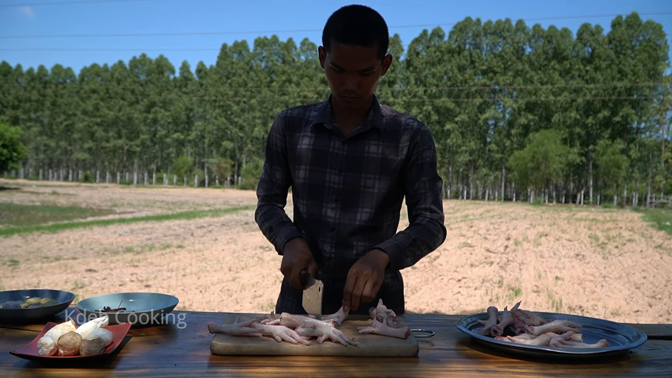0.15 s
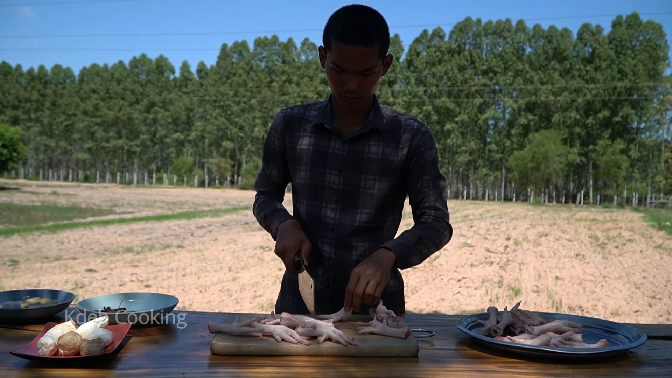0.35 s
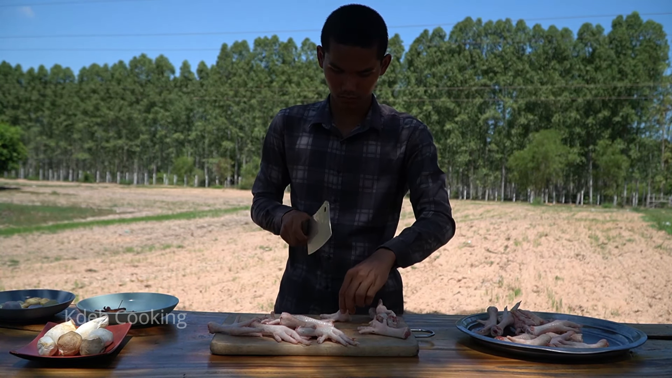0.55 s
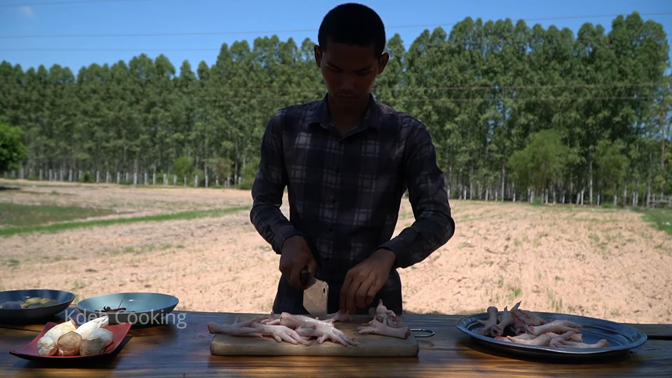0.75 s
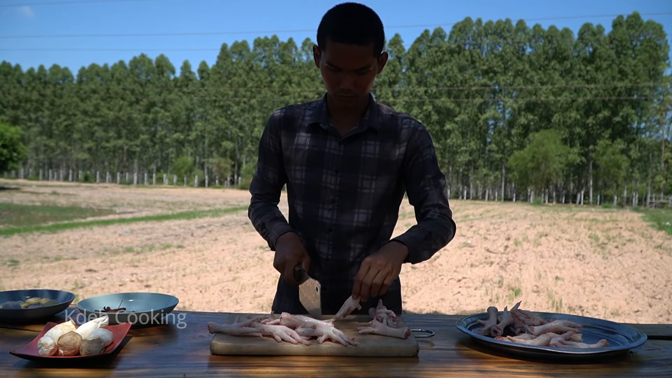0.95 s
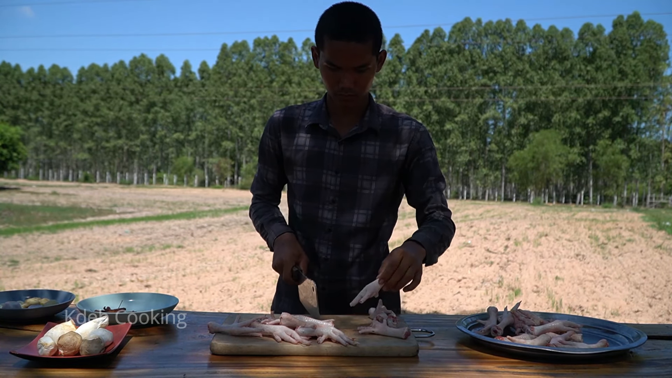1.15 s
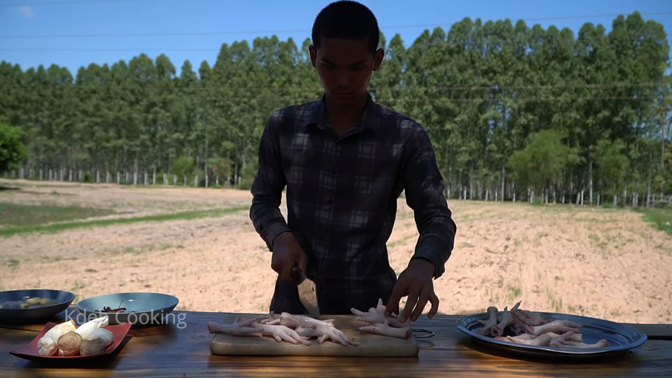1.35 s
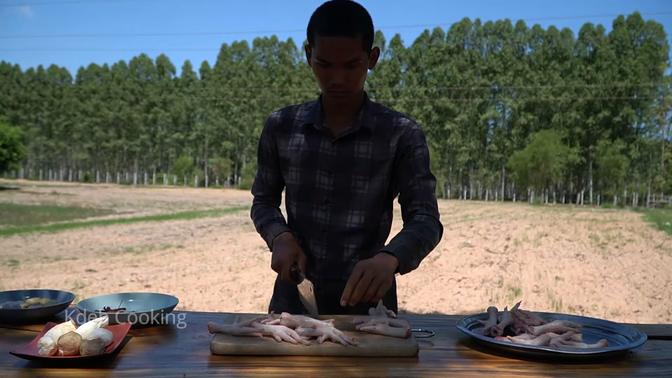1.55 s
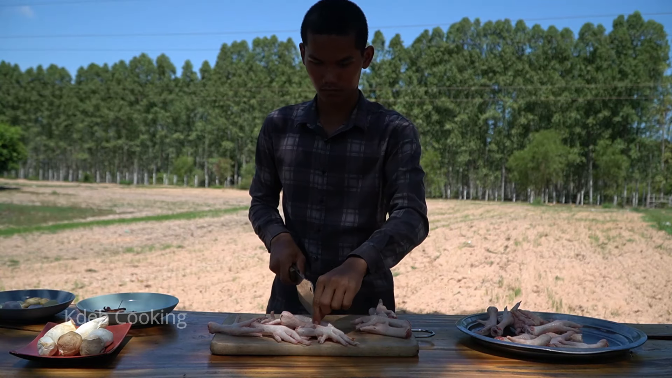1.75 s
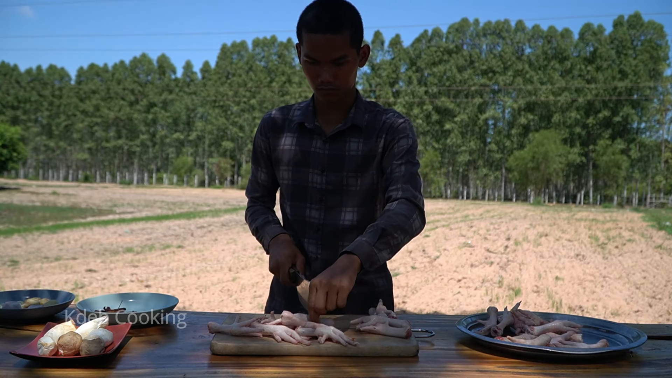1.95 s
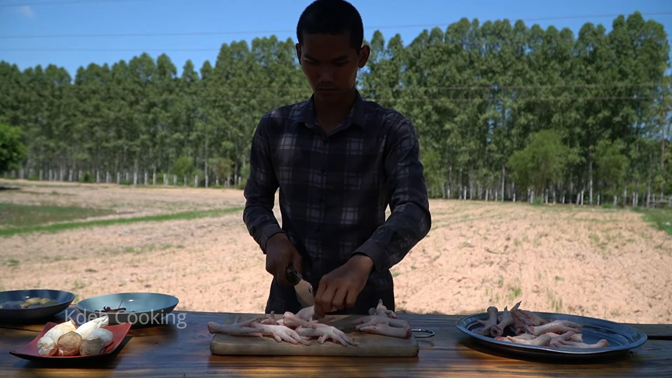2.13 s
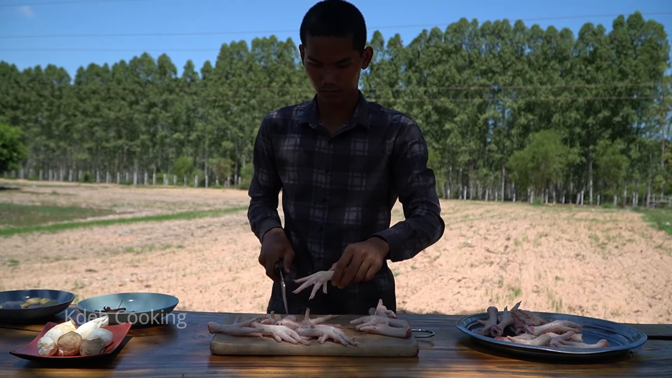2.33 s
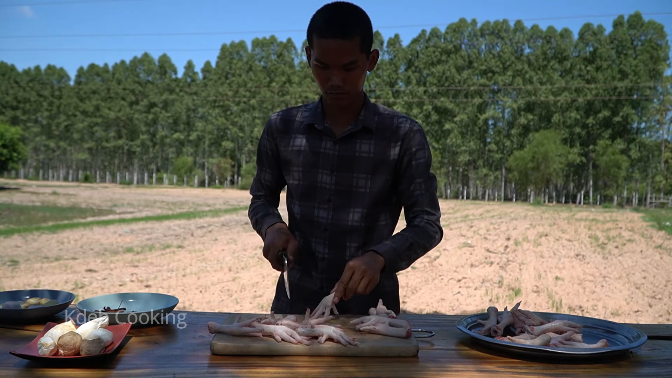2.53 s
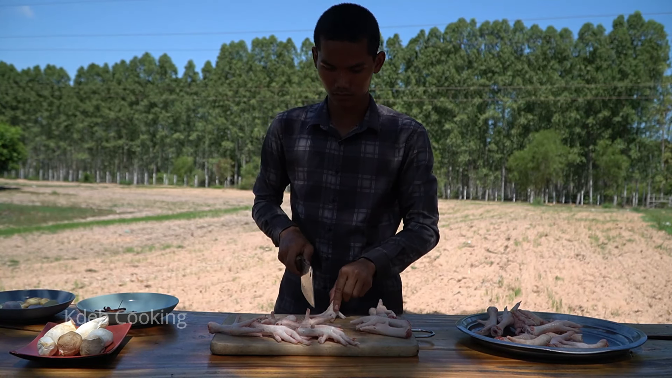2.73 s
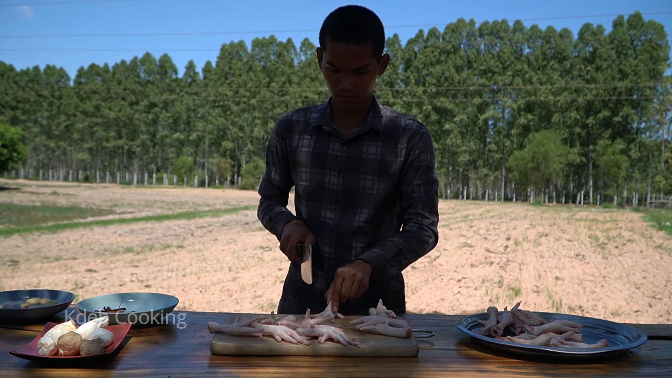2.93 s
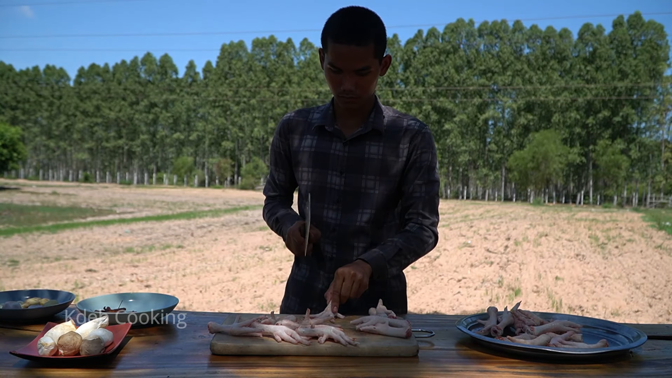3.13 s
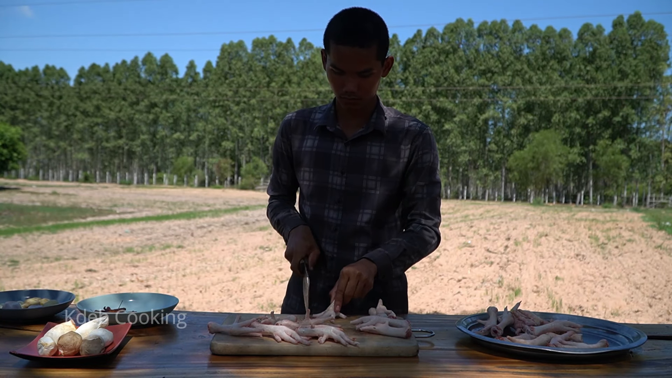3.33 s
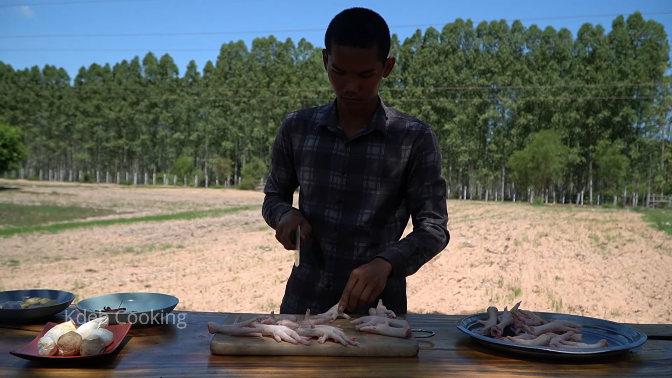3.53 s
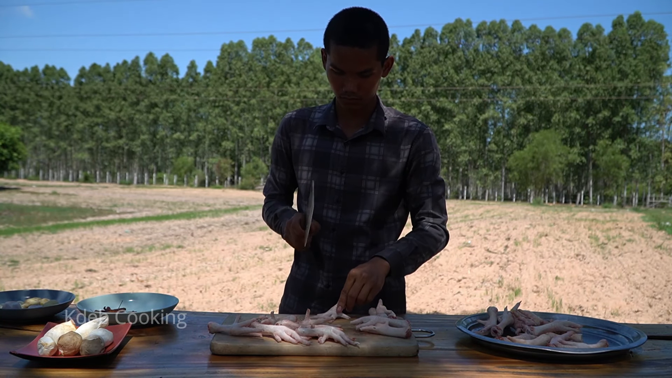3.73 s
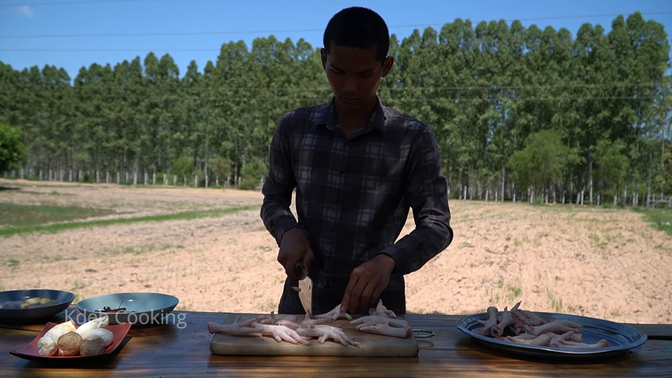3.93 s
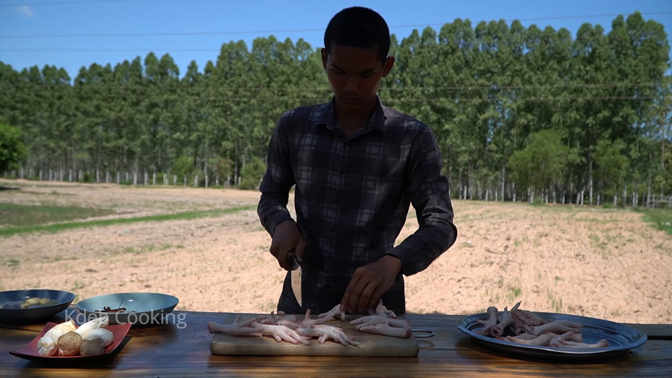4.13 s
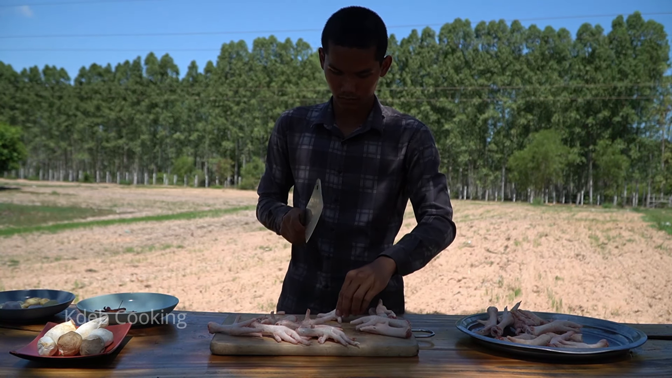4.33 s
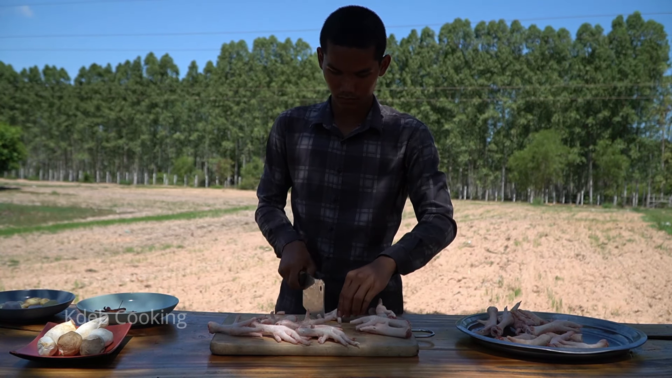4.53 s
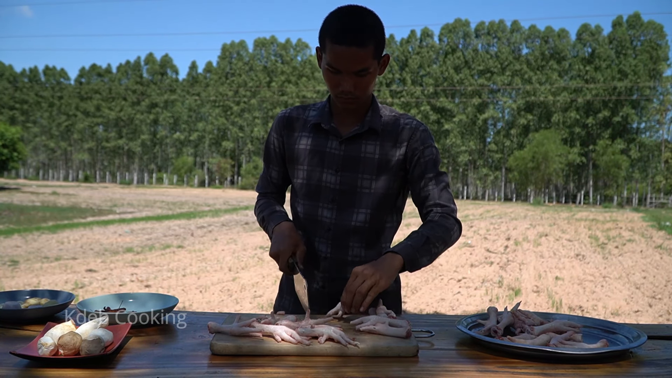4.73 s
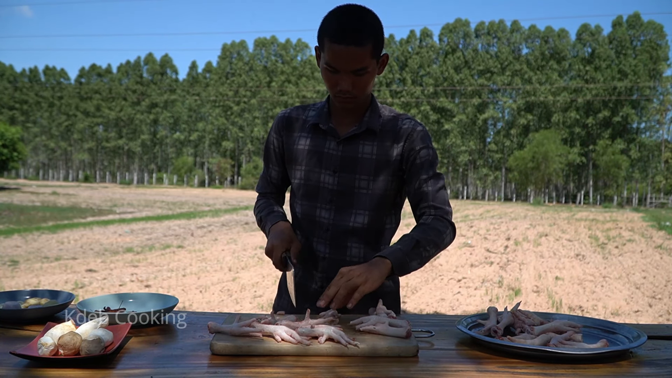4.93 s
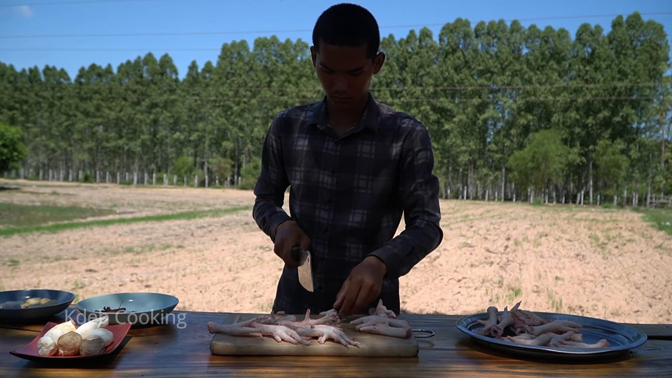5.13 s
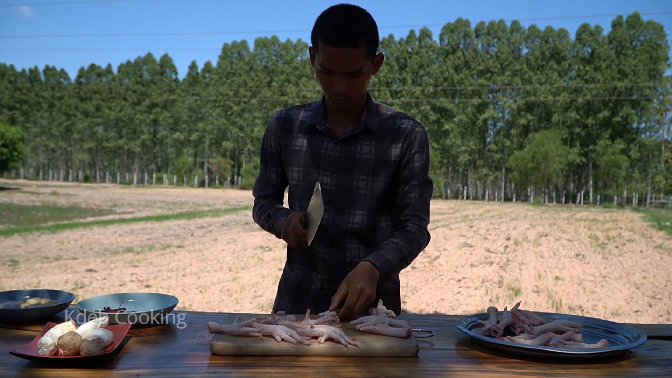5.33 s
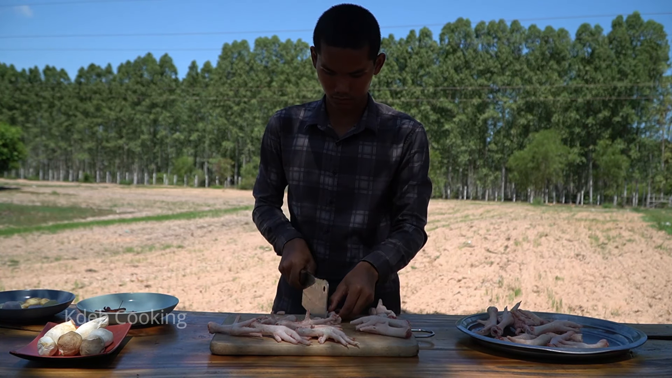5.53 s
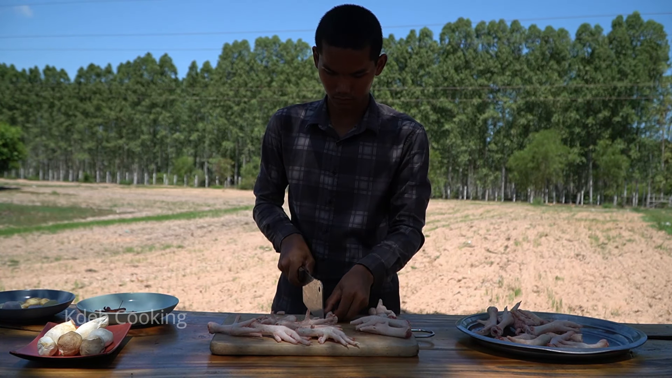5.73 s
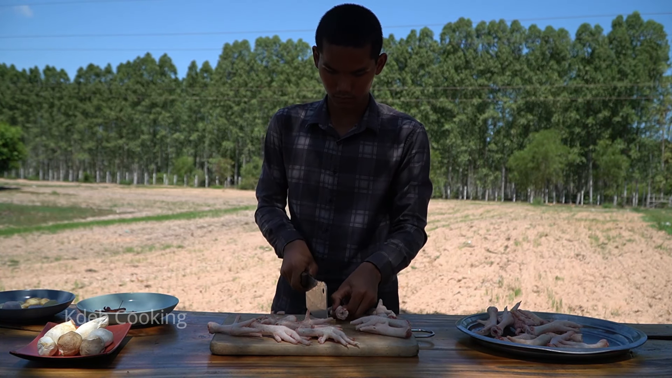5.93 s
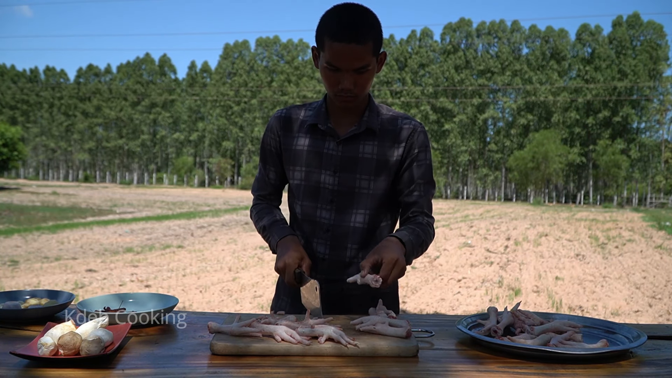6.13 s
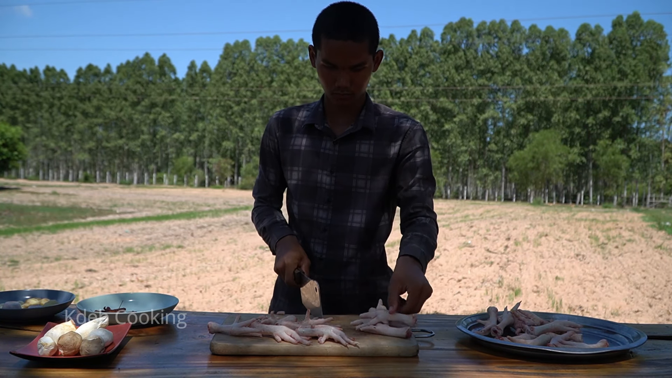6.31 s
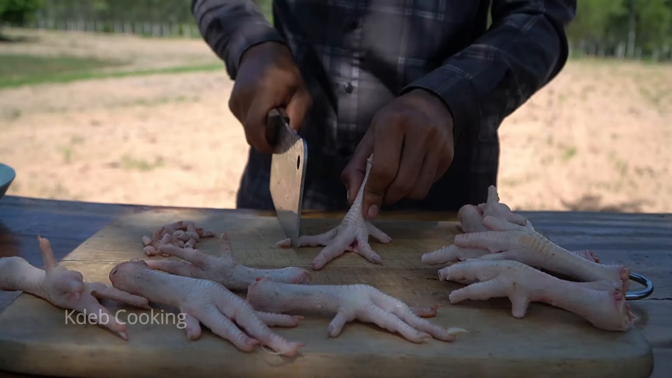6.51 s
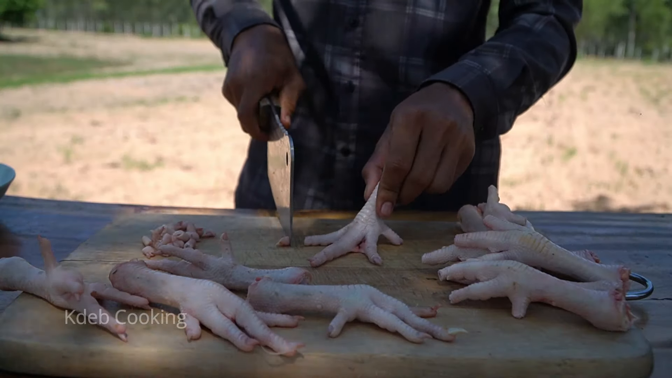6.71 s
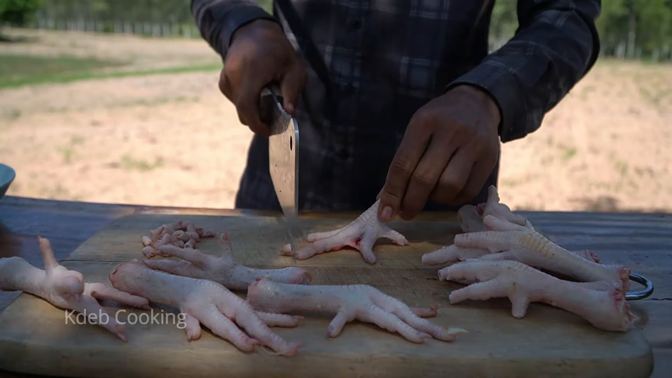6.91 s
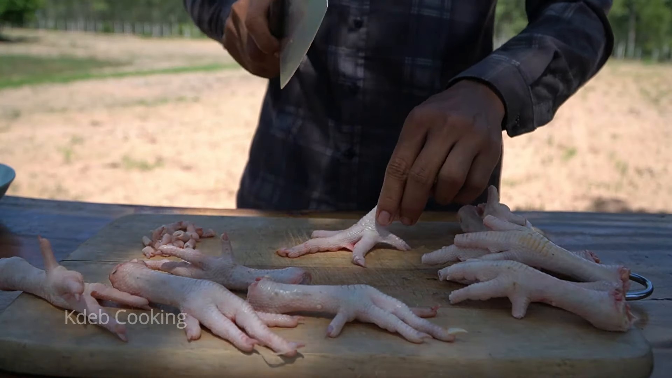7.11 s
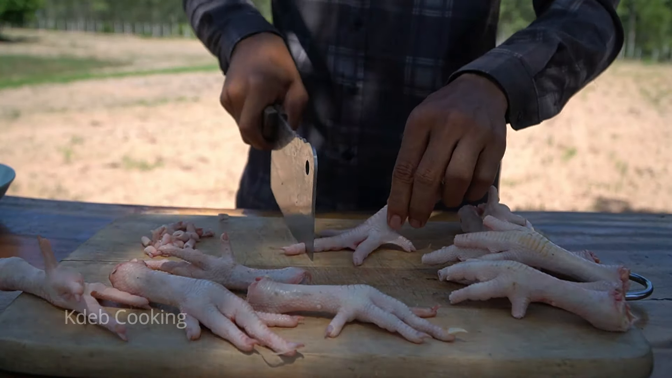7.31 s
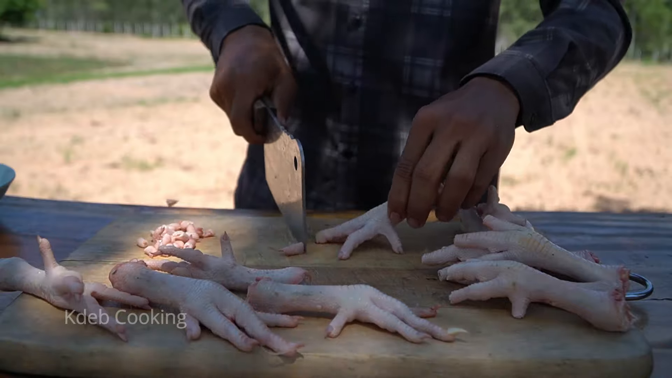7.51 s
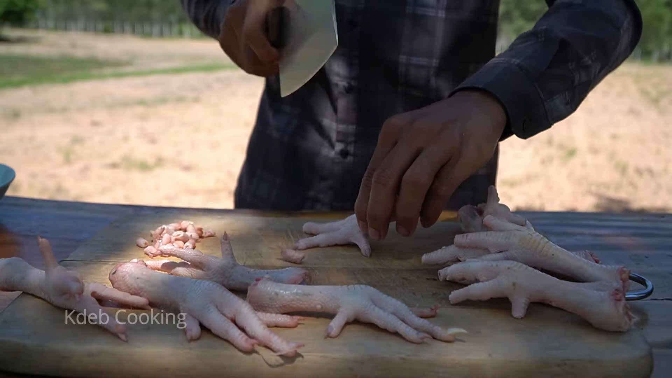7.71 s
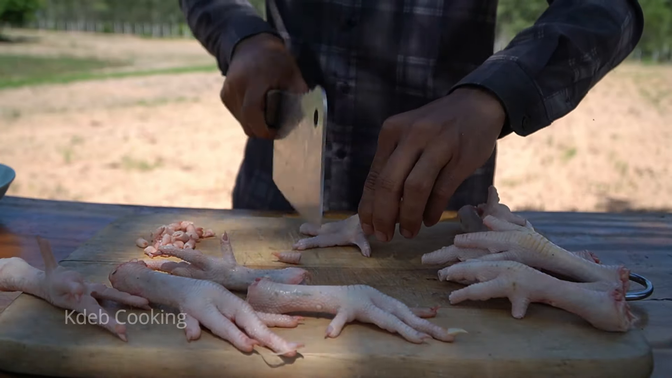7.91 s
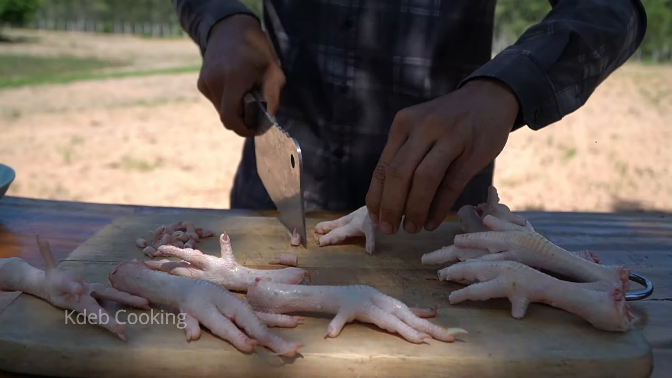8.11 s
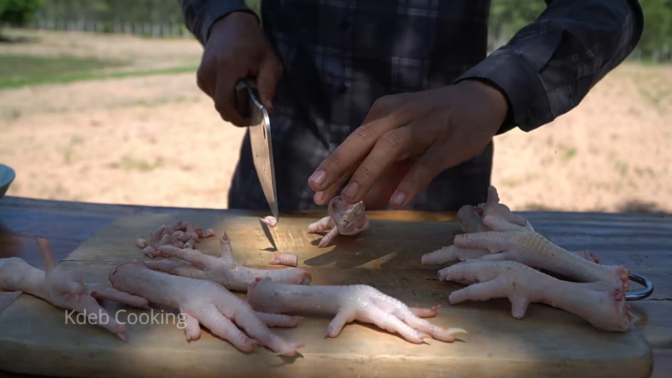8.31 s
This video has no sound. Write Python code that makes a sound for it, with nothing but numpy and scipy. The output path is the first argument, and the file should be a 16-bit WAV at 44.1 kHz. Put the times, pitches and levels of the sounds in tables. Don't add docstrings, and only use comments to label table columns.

```python
import sys
import numpy as np
from scipy import signal
from scipy.fft import rfft, irfft, next_fast_len
from scipy.io import wavfile

SR = 44100
rng = np.random.default_rng(int(sys.argv[2]) if len(sys.argv) > 2 else 0)


def digitize_waveform(pressure):
    field = np.atleast_2d(pressure).T
    bounded = np.clip(field, -1, 1)
    quanta = np.round(bounded * 32767).astype(np.int16)
    wavfile.write(sys.argv[1], SR, quanta)


def magnitude_from_level(level_db):
    exponent = np.asarray(level_db, float) / 20
    return 10 ** exponent


N = 368676
NEAR_S = 6.426

# start in seconds, ring level in dB, rattle level in dB,
# rattle tilt in dB per octave, decay factor.
BLOWS = [
    (0.206, -29.5, -32.5, 0.5, 1.045),
    (.818, -29.5, -30.5, 0.5, 1.08),
    (3.2821, -28, -33, 1, 1.01),
    (3.894, -31, -34, -0.1, 1.08),
    (4.5644, -30, -32.5, 0.44, 1.204),
    (5.5539, -29.5, -37, 1.6, 0.92),
    (6.5228, -30.5, -28.5, -1, 1),
    (7.2941, -30, -27.5, -3, 0.86),
    (7.9858, -29, -27, 0, 1.013),
]
# body in dB, hiss in dB.
BODY_DB = [(-7, 1), (-13, .1), (-6, 0), (-3, .1), (-5.5, 9), (-2.5, 16), (1, -1.5), (1.5, -3), (2, -1.5)]
# time in seconds, then crunch, knock, crack and edge levels in dB.
LANDINGS = [
    (0.2069, -27.5, -15.5, -15, -25.5),
    (.8184, -34.5, -16.5, -12.5, -22.5),
    (3.2844, -35, -15.5, -17.5, -29),
    (3.8936, -34.5, -17, -15.5, -31),
    (4.5653, -28, -16, -19, -27),
    (5.5562, -27, -17.5, -20.5, -29),
    (6.5217, -25, -15, -12.5, -24.5),
    (7.2961, -22, -13, -14, -20),
    (7.9849, -18.5, -13, -10, -20),
]
# knock in Hz, crack in Hz, crunch length in seconds,
# share of crunch at first bite, share of outer modes.
LANDING_COLOURS = [(1530, 2900, 0.0032, 0.17, 0.46), (1430, 2700, 0.0018, 0.34, 0.53),
                   (1550, 4010, 0.0037, .25, 0.27), (1320, 2460, 0.0041, .9, 0.44),
                   (1310, 2480, 0.0034, 0.33, 0.43), (1460, 2470, 0.0042, 0.37, .4),
                   (1160, 3100, .0025, 1, 0.61), (1050, 2870, 0.0041, 0.74, 0.37),
                   (1134, 3000, 0.0029, 0.22, 0.63)]
# frequency in Hz, t60 in seconds.
CONTACT_COLOURS = [
    [(1000, 0.011), (1400, 0.01), (1800, 0.0086)],
    [(2450, 0.0093), (3250, 0.0049), (4300, 0.0047)],
    [(5600, 0.0081), (7600, 0.00038), (10200, 0.0015)],
]


def at_hz(points, hz):
    table = np.array(points)
    return np.interp(np.log(hz), np.log(table[:, 0]), table[:, 1])


def rms_one(x):
    return x / np.sqrt(np.mean(x ** 2) + 1e-20)


def drift(rate):
    r = np.exp(-80 * np.pi * rate / SR)
    slow = signal.lfilter([1], [1, -2 * r, r * r], rng.standard_normal(N // 40 + 2002))[2000:]
    return np.interp(np.arange(N) / 40, np.arange(len(slow)), rms_one(slow))


def ring(drive, hz, t60):
    r, w = magnitude_from_level(-60 / (t60 * SR)), 2 * np.pi * hz / SR
    return signal.lfilter([0, np.sin(w)], [1, -2 * r * np.cos(w), r * r], drive + 1e-18)


def band_pass(x, low, high):
    return signal.sosfilt(signal.butter(2, [low, high], "band", fs=SR, output="sos"), x)


def clicks(seconds, sizes):
    train = np.zeros(N)
    np.add.at(train, (np.asarray(seconds) * SR).astype(int), sizes)
    return train


def grit(per_s, spread_db):
    sizes = magnitude_from_level(spread_db * np.minimum(rng.exponential(1, N), 4)) * rng.choice([-1, 1], N)
    return rms_one(sizes * (rng.random(N) < per_s / SR))


def hump(start, length):
    phase = np.clip((np.arange(N) / SR - start) / length, 0, 1)
    return np.sqrt(np.sin(np.pi * phase).clip(0))


def bands(source, likeness, gain_at, low_hz):
    edges = np.minimum(low_hz * 2 ** np.arange(0, np.log2(22000 / low_hz), .5), 17000)
    out = 0
    for k, (low, high) in enumerate(zip(edges, edges[1:])):
        mid, side = band_pass(source[k % 2], low, high)
        hz = np.sqrt(low * high)
        alike = np.clip(at_hz(likeness, hz), 0, 1)
        out = out + gain_at(hz) * (np.sqrt(1 + alike) * mid + np.sqrt(1 - alike) * side * [[1], [-1]])
    return out


def second_after(at):
    return slice(int(at * SR), int(at * SR) + SR)


def body_db(hz, db):
    return db / (1 + (hz / 390) ** 6)


def air():
    # time in seconds, leaves in dB, far drone in dB.
    wind = [
        [(0.0, -58.5, -100), (.6, -59.5, -105), (1.1, -58, -106), (1.66, -62, -102), (2.5, -60, -110),
         (3.4, -60.5, -102), (4.2, -61, -105), (4.75, -57, -102), (5.31, -60, -108), (6.06, -58.5, -107),
         (6.425, -60, -108)],
        [(6.427, -53, -104), (6.7, -51.5, -99), (7.4, -52, -102), (8.36, -50.5, -105)],
    ]
    # frequency in Hz, density in dB per Hz.
    leaves_far = [(15, -78), (25, -61), (102, -22.5), (141, -35.5), (293, -12), (326, -19.5), (887, -11),
                  (1020, -8.5), (1230, -6.5), (1890, -4.5), (2160, -2), (7110, -18.5), (16000, -37.5)]
    leaves_near = [(15, -86), (25, -43), (195, -36), (229, -27), (641, -16.5), (695, -9.5), (936, -10.5),
                   (1700, -3.5), (5280, -8), (12900, -20), (16000, -21)]
    # frequency in Hz, left-right likeness from 0 to 1.
    likeness = [(60, 0.83), (240, 0.18), (950, 0.47), (3770, 0.24), (15000, 0.041)]
    s, leaves_db, drone_db = np.transpose(wind[0] + wind[1])
    t = np.arange(N) / SR
    wind_db = np.interp(t, s, leaves_db) + .5 * drift(2.4)

    def gain_at(hz):
        colour_db = np.where(t < NEAR_S, at_hz(leaves_far, hz) + 4.97, at_hz(leaves_near, hz) + 5.6)
        return magnitude_from_level(colour_db + wind_db + 0.3 * drift(21))

    drone = rms_one(ring(rng.standard_normal(N), 120, 0.088)) * magnitude_from_level(np.interp(t, s, drone_db) + 1.0)
    hiss = bands(rng.standard_normal((2, 2, N)), likeness, gain_at, low_hz=24.75)
    return signal.sosfilt(signal.cheby2(8, 40, 16300, fs=SR, output="sos"), hiss) + drone


def dove():
    # start in seconds, length in seconds, level in dB, pitch in Hz.
    coos = [
        (2.308, 0.21, -88, 191),
        (2.56, 0.2, -85, 198),
        (3.414, 0.25, -81, 201),
        (3.66, 0.19, -85, 200),
    ]
    waver = np.cumsum(1 + 0.01 * drift(7.3)) / SR
    return sum(magnitude_from_level(db) * hump(s, length) * np.sin(2 * np.pi * hz * waver) for s, length, db, hz in coos)


def bird():
    # seconds from its first loud note, level in dB, pitch in Hz,
    # glide in semitones, length in seconds.
    song = [(-.283, -11, 4320, 2, 0.0091), (-.19, -2.5, 4440, 7, 0.022), (-.115, -5, 4230, -5, 0.0216),
            (-.097, -3, 3600, 0, 0.0067), (-.026, -9, 4100, 3, 0.019), (-.005, 1, 3730, -4, 0.0157),
            (0.034, -9.5, 4330, -5.5, 0.012), (0.048, 0, 3816, -4, 0.0135),
            (0.071, -3.5, 3620, -3.5, 0.022), (0.122, -4, 3990, -0.5, 0.0065),
            (0.146, -4, 4170, -7, 0.0134), (0.155, -3.5, 3750, 1, 0.011), (0.167, 1, 3750, -5.5, 0.0052),
            (0.192, -4.5, 4340, -.5, 0.025), (0.223, -0.5, 3830, 2, 0.0237), (0.251, 4, 3695, -3.5, 0.0148),
            (0.291, 2, 3580, 2, 0.0076), (0.388, -6, 3255, 3, .02)]
    # start in seconds, level in dB, pace factor, swell in dB per second.
    songs = [
        (-.15, -55, 0.97, 3),
        (1.064, -52, 0.99, -6),
        (2.302, -54.5, 0.98, 1),
        (3.669, -53.5, .99, 6),
        (4.975, -59, 1.001, 16),
        (6.264, -59.5, 0.92, -9),
    ]
    # time in seconds, peak
    # in dB, pitch in Hz, # glide in semitones, length in seconds.
    far_bird = [
        (2.016, -61.5, 3590, -1.5, 0.05),
        (5.29, -58.5, 3290, -3, 0.043),
        (5.399, -69, 3220, -.6, 0.071),
        (5.468, -78, 3180, -2, 0.019),
    ]
    notes = []
    for start, level_db, pace, swell_db in songs:
        chances = rng.standard_normal((len(song), 3))
        for (s, db, hz, glide, length), (late, loud, sharp) in zip(song, chances):
            note_db = level_db + db + swell_db * s + 1.7 * loud
            notes.append((start + pace * s + 0.001 * late, note_db, hz * (1 + 0.0047 * sharp), glide, length))
    out, flutter = np.zeros(N), magnitude_from_level(3 * drift(90))
    for s, db, hz, glide, length in notes + far_bird:
        if 0 < s < NEAR_S - length:
            samples = max(length, .004) * SR
            phase = np.arange(samples) / samples
            pitch = hz * 2 ** (glide * (phase - .5) / 12)
            whistle = np.sin(np.pi * phase) * np.sin(2 * np.pi * np.cumsum(pitch) / SR)
            span = slice(int(s * SR), int(s * SR) + len(phase))
            out[span] += magnitude_from_level(db) * flutter[span] * whistle
    echo = rng.standard_normal((2, 9000)) * magnitude_from_level(-36.0 - 60 * np.arange(9000) / SR / 0.51)
    echoes = signal.fftconvolve(out[None], echo * magnitude_from_level([[1.5], [-3]]))[:, :N]
    return out * magnitude_from_level([[-2.5], [-12]]) + echoes


def hands():
    # time in seconds, peak in dB, mode in Hz, t60 in seconds.
    soft_touches = [
        (2.035, -74, 92.59, 0.071),
        (2.856, -58.5, 257, 0.084),
        (6.262, -63, 564, 0.49),
        (8.245, -54, 902, .04),
    ]
    # start in seconds, length in seconds, level in dB, centre in Hz.
    drags = [
        (1.28, 0.094, -72, 1310),
        (2.894, 0.1, -66.5, 2010),
    ]
    out, rub = np.zeros(N), rng.standard_normal(N)
    for s, db, hz, t60 in soft_touches:
        cushioned = signal.lfilter([.02], [1, -.98], clicks([s], magnitude_from_level(db)))
        out += ring(cushioned, hz, t60)
    for s, length, db, hz in drags:
        out += magnitude_from_level(db) * hump(s, length) * rms_one(ring(ring(rub, hz, .003), hz, .003))
    return out


def scrapes():
    # start in seconds, length in seconds, steel in dB,
    # steel centre in Hz, wood in dB.
    pushes = [
        (2.239, 0.2, -68.5, 9000, -63),
        (4, 0.16, -77, 9000, -82),
        (7.398, 0.01, -55.5, 9800, -65),
        (8.079, 0.016, -53.5, 9720, -59),
    ]
    grazes = [
        (5.82, 0.15, -78, 9800, -61.5),
        (6.042, 0.057, -82, 11000, -72),
        (6.775, 0.163, -67, 9200, -50),
    ]
    # frequency in Hz, bandwidth in Hz, level in dB.
    steel = [(1950, 40, 4), (2490, 49, -1), (2890, 80, -1.5), (3940, 110, 2), (5240, 18, 3), (6340, 45, -6),
             (6870, 50, -4), (8330, 56, -2.5), (9700, 44, -23), (9950, 31, -0.5), (11400, 110, -9),
             (12000, 45, -18), (13700, 95, -13), (15650, 90, -16)]
    push, graze = (2.5, -8, 2.2, grit(350, 0.7)), (1, -24, 3.0, grit(132, 1.8))
    strokes = [(*row, *push) for row in pushes] + [(*row, *graze) for row in grazes]
    out = np.zeros(N)
    for start, length, steel_db, centre_hz, wood_db, octaves, rasp_db, damping, grains in strokes:
        span = slice(int(start * SR), int((start + length + .15) * SR))
        drive = (grains * hump(start, length))[span]
        for hz, width, db in steel:
            t60 = np.log(1000) / (np.pi * damping * np.clip(width, 30, 150))
            wander = np.interp(np.arange(len(drive)) / SR * 45, np.arange(20), rng.standard_normal(20))
            press = magnitude_from_level(5 * wander)
            reach_db = -6 * (np.log2(hz / centre_hz) / octaves) ** 2
            rung = ring(ring(drive * press, hz, .0012), hz, t60) / np.sqrt(t60 * SR / 28) / 5
            out[span] += magnitude_from_level(steel_db + db + reach_db - 3) * rung
        out[span] += magnitude_from_level(wood_db) * band_pass(drive, 600, 3500)
        out[span] += magnitude_from_level(steel_db + rasp_db) * band_pass(drive, 4500, 16000)
    return out


def stick_slip():
    # time in seconds, level in dB, tilt in dB per octave.
    slips = [(2.225, -65, 3), (2.248, -53.5, -1), (2.266, -52, -3), (2.279, -52.5, -2), (2.293, -51, -2),
             (2.305, -51.5, -3), (2.315, -55, 2), (2.324, -51, 0), (2.334, -51, 4), (2.342, -54, 3),
             (2.353, -51.5, -3.5), (2.371, -51, 3), (2.376, -58, 7), (2.38, -57, 8), (2.385, -55, 5),
             (2.4, -55, 5.5)]
    # frequency in Hz, level in dB, t60 in seconds.
    slip_modes = [(513, -18, 0.055), (897, -9, 0.036), (1200, -7.5, 0.025), (1300, -8, 0.025),
                  (1860, -16, 0.046), (2420, -15.5, 0.035)]
    s, peak_db, tilt_db = np.transpose(slips)
    out, span = np.zeros(N), slice(int(s[0] * SR) - 10, int((s[-1] + .1) * SR))
    strengths = rng.normal(0, 2.5, (len(s), len(slip_modes)))
    for k, (hz, db, t60) in enumerate(slip_modes):
        rough = .3 + .1 * rng.standard_normal(span.stop - span.start)
        sizes = magnitude_from_level(peak_db + db + 3.0 + tilt_db * np.log2(hz / 1000) + strengths[:, k])
        release = np.exp(-1 / (.00015 * SR))
        bursts = signal.lfilter([1], [1, -release], clicks(s, sizes)[span] + 1e-18)
        out[span] += ring(band_pass(rough * bursts, 0.69 * hz, 1.9 * hz), hz, t60)
    return out


def skips():
    # time in seconds, level in dB.
    ticks = [
        (4.7435, -64),
        (4.7528, -62),
        (4.758, -64),
        (4.762, -63),
        (4.7742, -55),
        (4.7857, -55),
        (4.797, -64),
        (4.8151, -66),
        (4.82, -68),
        (4.8361, -65),
    ]
    # frequency in Hz, level in dB, t60 in seconds.
    tip = [(4120, -3, .012), (5260, 2, .012), (8100, -7, 0.028), (10000, 0, 0.023), (11900, -15, 0.036),
           (13700, -10, .03), (15700, -9, .05)]
    # start in seconds, length in seconds, level in dB.
    start, length, rub_db = (4.735, .12, -88.5)
    s, tick_db = np.transpose(ticks)
    out, span = np.zeros(N), slice(int(start * SR), int((start + length + .1) * SR))
    strengths = rng.normal(0, 2.5, (len(s), len(tip)))
    rub = magnitude_from_level(rub_db) * hump(start, length) * grit(900, 1.5)
    for k, (hz, db, t60) in enumerate(tip):
        drive = clicks(s, magnitude_from_level(tick_db + db - 2.0 + strengths[:, k])) + magnitude_from_level(db) * rub
        out[span] += ring(drive[span], hz, t60)
    return out


def rattle():
    # frequency in Hz, density in dB per Hz.
    spectrum = [(59, -57), (100, -67), (190, -52), (271, -35), (389, -20.5), (535, -15), (676, -10.5),
                (970, -4), (1360, -3.5), (1760, -10.5), (2000, -7.5), (4380, -14.5), (10700, -41),
                (16000, -49)]
    # frequency in Hz, t60 in seconds.
    decay_times = [(100, 0.15), (300, 0.28), (1000, 0.58), (2000, 0.5), (5000, 0.38), (13000, 0.058)]
    # frequency in Hz, left-right likeness from 0 to 1.
    likeness = [(60, 0.66), (180, 1), (550, 0.8), (1650, 0.6), (4970, 0.092), (15000, 0.03)]
    t = np.arange(N) / SR
    grains = 0.55 * rng.standard_normal((2, 2, N)) + 0.098 * grit(800, 1.1)

    spatter = np.zeros(N)
    for (at, _, db, *_), (_, spatter_db) in zip(BLOWS, BODY_DB):
        span = second_after(at)
        since = t[span] - at
        rise = 1 - np.exp(-(since / .028) ** 2)
        spatter[span] += rise * magnitude_from_level(db + spatter_db - 60 * since / .3)

    def gain_at(hz):
        level = np.zeros(N)
        for (at, _, db, tilt_db, decay), (low_db, _) in zip(BLOWS, BODY_DB):
            span = second_after(at)
            since = np.maximum(t[span] - at, 0)
            rise = 1 - np.exp(-since * hz)
            start_db = db + 15.0 + body_db(hz, low_db) + tilt_db * np.log2(hz / 1000)
            level[span] += rise * magnitude_from_level(start_db - 60 * since / (at_hz(decay_times, hz) * decay))
        thin = magnitude_from_level(-33) / np.sqrt(1 + (11000 / hz) ** 4)
        return (level * magnitude_from_level(at_hz(spectrum, hz)) + thin * spatter) * magnitude_from_level(2.66 * drift(28))

    return bands(grains, likeness, gain_at, low_hz=100.5)


def board():
    # frequency in Hz, level in dB, t60 in seconds.
    board_far = [(278.6, -23.5, 0.59), (508.6, -6.5, 0.42), (564, -6.5, 0.37), (759, -15.5, 0.48),
                 (856, -9, 0.42), (963, -9.5, 0.62), (987.4, -13, 0.75), (1061, -11, 0.58),
                 (1363, -20.5, 1), (1152, -11.5, 0.64), (1753, -17, 0.74), (1846, -17.5, 0.38),
                 (1590, -22, 0.82), (2140, 0, 0.098), (3040, -7, 0.18), (2970, -14, 0.2)]
    board_near = [(168, -28, .32), (327.4, -17.5, 0.5), (450.5, -9, 0.51), (542.3, -2.5, 0.41),
                  (772, -11, 0.34), (820, -26, 0.49), (987, -11, 0.8), (1040, -14, 1), (1140, -7, 0.6),
                  (1672, -10.5, 0.61), (1600, -5, 0.12), (1776, -11.5, 0.3), (1916, -7.5, 0.26),
                  (2260, 0, 0.071), (1485, -49, 0.23), (2840, -19, 0.24)]
    plates_far = [(872, -4.5, 0.36), (1260, -10.5, 0.74), (1343, -13.5, 0.83)]
    plates_near = [(964, -8, 0.9), (1025, -7.5, 0.77), (1313, -16.5, 1)]
    table_thud = (145.5, -28, 0.49)
    thuds_db = [-19, -18, 5, 5.5, 3, 3.5, 2.5, 2, -2]
    plates_db = [(-0.5, -3.5, 1.5), (3.5, 4, 2.5), (2.5, -1.5, -0.5), (1, 4, -0.5), (3.5, 0.5, 0),
                 (3, -7, -12), (-3, 1.5, -1), (3, 5, -16), (-1.5, -5, 4)]
    out, t = np.zeros((2, N)), np.arange(N) / SR
    for (at, ring_db, _, _, decay), thud_db, plate_db, (low_db, _) in zip(BLOWS, thuds_db, plates_db, BODY_DB):
        span, far = second_after(at), at < NEAR_S
        since = t[span] - at
        modes, plates = (board_far, plates_far) if far else (board_near[1:], plates_near)
        modes = modes + [np.add(plate, [0, db, 0]) for plate, db in zip(plates, plate_db)]
        modes = modes + [np.add(table_thud, [0, thud_db, 0])]
        for k, (hz, db, t60) in enumerate(modes):
            t60 = min(t60, 1.2) * decay
            shake = rng.standard_normal(len(since)) * magnitude_from_level(-60 * since / t60)
            shake = shake / np.sqrt(np.sum(shake ** 2)) * (1.15 if far else .95)
            shake = magnitude_from_level(ring_db + db + body_db(hz, low_db) + 5.5) * shake
            lean = 0.089 * (-1) ** k * hz / (hz + 500)
            own_share = .3 if hz < 200 else .12 if far else .26
            out[:, span] += ring(shake, hz, own_share * t60) * [[1], [lean]]
    return out


def flash():
    # frequency in Hz, t60 in seconds.
    blade_modes = [(10100, 0.011), (11800, 0.0062), (13800, .01)]
    flash_db = [(-49, -49, -54), (-54, -56, -54), (-38, -61, -44), (-47, -52, -50), (-59, -47, -46),
                (-46, -38, -48), (-47, -44, -44), (-38, -50, -44), (-31, -49, -46)]
    out, tap = np.zeros(N), np.eye(1, 1000)[0]
    for (s, *_), levels in zip(LANDINGS, flash_db):
        at = int((s - .0012) * SR)
        for (hz, t60), db in zip(blade_modes, levels):
            out[at:at + len(tap)] += magnitude_from_level(db) * ring(ring(tap, hz, 0.0018) / 6, hz, t60)
    return out


def crunch():
    bites = np.zeros(N)
    for (at, db, *_), (_, _, length, first, _) in zip(LANDINGS, LANDING_COLOURS):
        bite = np.linspace(first, 1, int(length * SR))
        bites[int(at * SR) - len(bite):int(at * SR)] = magnitude_from_level(db) * bite
    far, near = np.split(grit(15000, 3.9) * bites, [int(NEAR_S * SR)])
    return np.concatenate([band_pass(far, 1300, 6570), band_pass(near, 1300, 10000)])


def touches():
    # time in seconds, knock in dB, crack in dB.
    rebounds = [(0.2086, -21, -24), (.21, -24, -22), (.2114, -28, -21), (0.2144, -31, -32),
                (0.216, -20.5, -31), (0.82, -23, -27), (0.8211, -24, -23), (.823, -22, -25),
                (0.8293, -24, -37), (0.8357, -28, -34), (0.8494, -30, -38), (3.2876, -25, -21),
                (3.2975, -26, -21), (3.3028, -18, -28), (3.305, -26, -22), (3.307, -24, -26),
                (3.8956, -25, -20), (3.898, -27, -28), (3.9042, -21, -32), (3.906, -22, -25),
                (3.9115, -24, -27), (3.9133, -21, -20), (3.9163, -23, -28), (4.5673, -25, -25.5),
                (4.569, -28, -24), (4.578, -23, -21.5), (4.5805, -26, -24), (4.586, -25, -23),
                (4.5924, -25, -24), (5.5599, -21, -28), (5.574, -23.5, -21.5), (6.5221, -15.5, -14),
                (6.5247, -18, -21), (6.5272, -21, -30), (6.531, -27, -21), (6.5345, -28, -24),
                (6.5385, -33, -34), (6.545, -22, -21), (6.557, -24, -37), (6.565, -26, -38),
                (7.299, -12, -14.5), (7.306, -33, -22.5), (7.3135, -27, -29), (7.3225, -36, -43),
                (7.9877, -16, -12.5), (7.9894, -28, -22), (8.005, -26, -19), (8.021, -29, -28)]
    # knock, crack and edge in dB.
    chatter_db = [-12, -12, -24]
    loss_db = [.8, 2.5, 1.5]
    usual = (CONTACT_COLOURS[0][1][0], CONTACT_COLOURS[1][1][0], 0.75)
    rows = []
    for (s, _, *levels), (*hz, _, _, outer) in zip(LANDINGS, LANDING_COLOURS):
        rows.append((s, *levels, *hz, outer))
        for k, (late, *chance) in enumerate(rng.standard_normal((5, 4))):
            db = np.add(levels, chatter_db) - k * np.array(loss_db) + 2.0 * np.array(chance)
            rows.append((s + .0065 * (k + 1 + .2 * late), *db, *usual))
    for s, knock_db, crack_db in rebounds:
        rows.append((s, knock_db, crack_db, -42 + .45 * crack_db, *usual))
    return rows


def contacts():
    out = crunch()
    fade = np.exp(-np.arange(1200) / (.0005 * SR))
    landing_times = [row[0] for row in LANDINGS]
    for s, *levels, knock_hz, crack_hz, outer in touches():
        held = 0.64 if s in landing_times else 1
        at = int((s - .0009) * SR)
        centres = (knock_hz, crack_hz, CONTACT_COLOURS[2][1][0])
        bursts = rng.standard_normal((3, 1200)) * fade * [[0.79], [0.79], [1]]
        bursts[:2, 0] = 3
        for level_db, colours, centre, burst in zip(levels, CONTACT_COLOURS, centres, bursts):
            top_hz = min(1.4 * colours[-1][0], 17000)
            soft = signal.lfilter(*signal.butter(2, top_hz, fs=SR), burst)
            rung = np.zeros(1200)
            for k, (hz, t60) in enumerate(colours):
                share = 1 if k == 1 else -outer
                rung += share * ring(soft, hz * centre / colours[1][0], t60 * held)
            out[at:at + 1200] += magnitude_from_level(1.12 * level_db + 3) * rung / np.abs(rung).max()
    return signal.sosfilt(signal.butter(2, 600, "high", fs=SR, output="sos"), out)


def scene():
    ringing, leaning = board()
    table = contacts() + ringing + scrapes() + stick_slip() + skips() + flash() + hands()
    table = signal.sosfilt(signal.butter(1, 15000, fs=SR, output="sos"), table)
    size = next_fast_len(N)
    hz = np.arange(size // 2 + 1) * SR / size
    apart = .6j * hz / (hz + 2500) + 0.36 * np.exp(-(np.log2((hz + 1) / 6500) / 0.59) ** 2)
    side = irfft(rfft(table, size) * apart, size)[:N] + leaning
    near = table + side * [[1], [-1]] + rattle()
    near = signal.sosfilt(signal.butter(10, 136, "high", fs=SR, output="sos"), near)
    return near + bird() + dove() + air()


def roll_off(x):
    return signal.sosfilt(signal.butter(12, 17040, fs=SR, output="sos"), x)


def record(dry):
    mix = signal.sosfilt(signal.cheby2(12, 60, 17300, fs=SR, output="sos"), dry)
    return roll_off(mix)


dry = scene()
out = record(dry)
digitize_waveform(out)
```